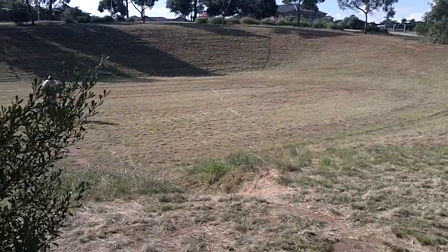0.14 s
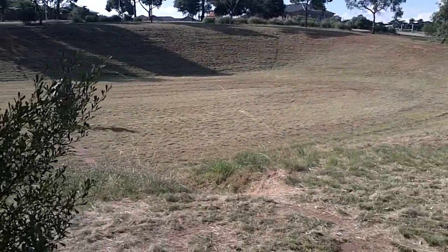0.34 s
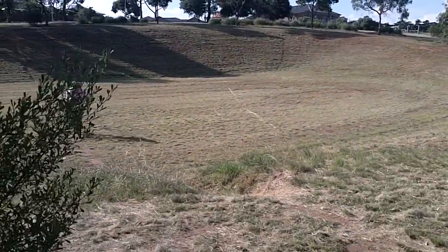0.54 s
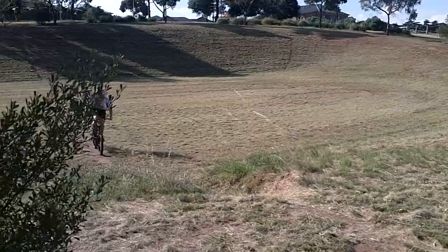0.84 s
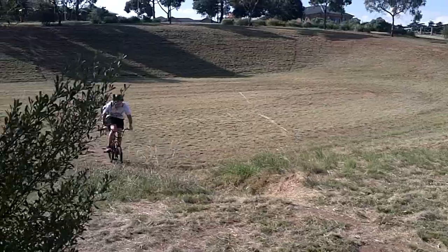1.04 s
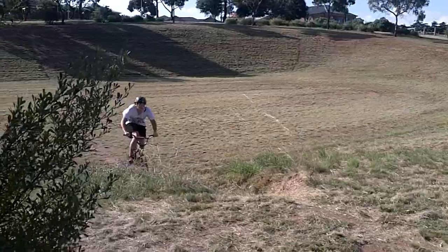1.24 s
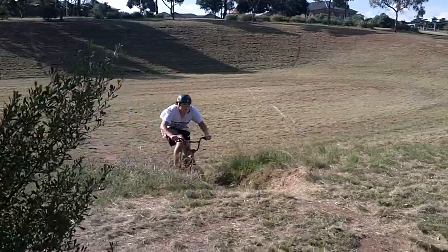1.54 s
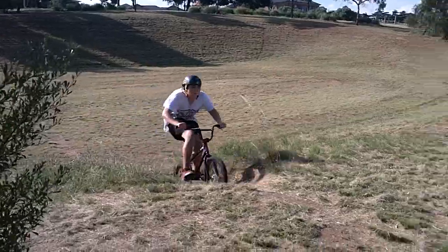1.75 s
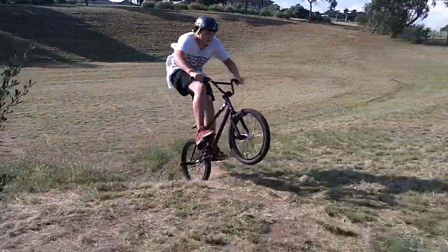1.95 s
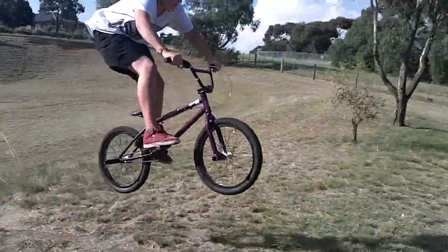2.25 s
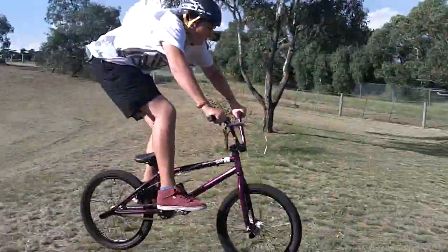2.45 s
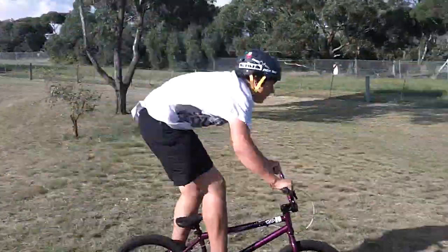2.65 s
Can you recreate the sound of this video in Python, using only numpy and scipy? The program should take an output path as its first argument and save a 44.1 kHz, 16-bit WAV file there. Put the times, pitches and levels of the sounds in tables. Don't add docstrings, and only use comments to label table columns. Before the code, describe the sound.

A small bicycle rushes nearer through dry grass, freewheel ticking in a jump, then thumps down close by

```python
import sys
import numpy as np
from scipy import signal
from scipy.fft import rfft, irfft
from scipy.io import wavfile
from scipy.ndimage import uniform_filter1d

SR = 44100
rng = np.random.default_rng(int(sys.argv[2]) if len(sys.argv) > 2 else 0)


def dump_mix(stems):
    frames = np.atleast_2d(stems).T
    limited = np.clip(frames, -1, 1)
    pcm = np.round(limited * 32767).astype(np.int16)
    wavfile.write(sys.argv[1], SR, pcm)


def gain_from_db(level_db):
    decades = np.asarray(level_db, float) / 20
    return 10 ** decades


N = 122598


def rms_one(x):
    return x / np.sqrt(np.mean(x ** 2) + 1e-20)


def in_time(rows):
    s, *columns = np.transpose(rows)
    return [np.interp(np.arange(N) / SR, s, column) for column in columns]


def drift(rate_hz):
    r = np.exp(-2 * np.pi * rate_hz * 40 / SR)
    white = rng.standard_normal(N // 40 + 2002)
    slow = signal.lfilter([1], [1, -2 * r, r * r], white)[2000:]
    return np.interp(np.arange(N) / 40, np.arange(len(slow)), rms_one(slow))


def band(x, low_hz, high_hz):
    sos = signal.butter(2, [low_hz, min(high_hz, .45 * SR)], "band", fs=SR, output="sos")
    return signal.sosfilt(sos, x)


def banded_noise(spectrum, patchy_db, rate_hz):
    hz, db = np.transpose(spectrum)
    edges = 16 * 2 ** np.arange(0, 10.6, .5)
    together = drift(rate_hz)
    white = rng.standard_normal((2, N + SR // 2))
    out = 0
    for k, (low_hz, high_hz) in enumerate(zip(edges, edges[1:])):
        middle = np.log(low_hz * high_hz) / 2
        band_db = np.interp(middle, np.log(hz), db, left=-90, right=-90)
        if band_db > -90:
            flicker_db = patchy_db * (together + 0.78 * drift(rate_hz))
            out = out + gain_from_db(band_db + flicker_db) * band(white[k % 2], low_hz, high_hz)[-N:]
    return rms_one(out)


def wind():
    # start_s, level_db
    wind_levels = [(0.0, -31.5), (0.1, -29), (0.32, -35), (0.53, -31), (0.76, -34), (1.35, -31.5),
                   (2.01, -28.5), (2.4, -28.5), (2.51, -31), (2.69, -20.5), (2.78, -26.5)]
    # edge_hz, density_db (per Hz)
    wind_colour = [(12, -32), (20, 4.5), (103, -5.5), (229, -14.5), (338, -24.5), (475, -28.5), (560, -35),
                   (700, -33.5), (910, -19), (1540, -120)]
    wind_db, = in_time(wind_levels)
    return gain_from_db(wind_db + 0.5) * banded_noise(wind_colour, patchy_db=0.95, rate_hz=25.5)


def buffets():
    # middle_s, level_db, length_s, low_hz, high_hz
    gusts = [(.1, -25.5, 0.029, 74, 131.4), (.8, -21, 0.012, 37.6, 248), (0.836, -25.5, 0.068, 24, 257),
             (.88, -27, 0.026, 62, 300), (.985, -27.5, 0.024, 34, 192), (1.1, -16.5, 0.035, 28.3, 314),
             (1.2, -26.5, 0.079, 21.8, 98), (1.376, -25, 0.081, 22.3, 117), (1.553, -7.5, 0.031, 26, 320),
             (1.74, -16, 0.033, 31, 308), (1.79, -21, 0.038, 46, 410), (1.87, -23, 0.021, 137, 323),
             (1.93, -27.5, 0.04, 69, 205), (2.06, -17, 0.044, 32.3, 235), (2.246, -20.5, 0.02, 31, 258),
             (2.3, -22, 0.03, 24, 150), (2.45, -26.5, 0.086, 30, 120), (2.54, -19.5, 0.061, 90, 251),
             (2.605, -14.5, 0.046, 91, 242), (2.66, -14.5, 0.049, 13.8, 198), (2.685, -11, 0.019, 25, 256),
             (2.72, -17, 0.023, 110, 620), (2.748, -13, 0.028, 86.4, 284), (2.778, -8.5, 0.011, 69, 370)]
    tilt_db = -4
    t = np.arange(-4096, 4096) / SR
    out = np.zeros(N)
    for middle_s, db, length_s, low_hz, high_hz in gusts:
        white = rng.standard_normal(2 * len(t))
        swell = np.exp(-(2 * t / length_s) ** 2)
        edges = np.geomspace(low_hz, high_hz, num=4)
        lump = 0
        for k, (a, b) in enumerate(zip(edges, edges[1:])):
            third = band(band(white, .7 * a, 1.3 * b), a, b)[len(t):]
            lump = lump + gain_from_db(tilt_db * k) * rms_one(swell * third)
        lump = rms_one(lump) * np.sqrt(np.mean(swell ** 2))
        at = int(middle_s * SR) + np.arange(len(t)) - len(t) // 2
        inside = (at >= 0) & (at < N)
        out[at[inside]] += gain_from_db(db) * lump[inside]
    return out


def field():
    # edge_hz, density_db (per Hz)
    field_colour = [(150, -0.5), (450, -6), (650, -7), (1050, -7), (2000, -15), (4000, -22.5),
                    (7000, -31.5), (14500, -47.5)]
    hiss = gain_from_db(-41.5) * banded_noise(field_colour, patchy_db=1.12, rate_hz=6.3)
    return signal.sosfilt(signal.butter(8, 14300, fs=SR, output="sos"), hiss)


def road():
    low_hz, high_hz, drone_db = 385, 513.5, -49
    fade_db = np.interp(np.arange(N) / SR, (1.9, 1.9), [0, -19])
    drone = band(band(rng.standard_normal(N), low_hz, high_hz), low_hz, high_hz)
    return gain_from_db(drone_db + fade_db + 0.93 * drift(3.3)) * rms_one(drone)


def bird():
    # start_s, pitch_hz, level_db
    chirp = [
        (0.0, 6060, -76),
        (0.01, 6540, -57),
        (0.026, 7185, -63),
        (0.032, 7100, -60),
        (0.04, 6623, -68),
        (0.05, 6350, -73),
    ]
    hz, db = in_time(chirp)
    whistle = np.sqrt(2) * np.sin(2 * np.pi * np.cumsum(hz) / SR)
    sounding = np.arange(N) < chirp[-1][0] * SR
    return gain_from_db(db + 6) * whistle * sounding


def frame_tick():
    first_s, ticks_per_s = .0055, 59.94
    ring_hz, tick_db, t60_s = 7750, -57, .006
    at_s = np.arange(first_s, N / SR, 1 / ticks_per_s)
    clicks = np.full(N, 1e-18)
    clicks[(at_s * SR).astype(int)] = gain_from_db(tick_db)
    r, w = gain_from_db(-60 / (t60_s * SR)), 2 * np.pi * ring_hz / SR
    ring = signal.lfilter([0, np.sin(w)], [1, -2 * r * np.cos(w), r * r], clicks)
    return band(ring, ring_hz - 600, ring_hz + 900)


def rush():
    # edge_hz, density_db (per Hz)
    rush_colour = [(500, -16), (850, -7.5), (1300, 2.5), (2000, 2), (4200, -4), (6500, -7), (10000, -13),
                   (15000, -14.5)]
    take_off_s, grass_low_hz, grass_lost = (2.1, 2.18), 3500, .55
    x = gain_from_db(12.5) * banded_noise(rush_colour, patchy_db=.8, rate_hz=25)
    grass = signal.sosfiltfilt(signal.butter(2, grass_low_hz, "high", fs=SR, output="sos"), x)
    return x - grass * np.interp(np.arange(N) / SR, take_off_s, [0, grass_lost])


def tyre_ring():
    middle_hz, width_hz, ring_db = 973, 163, 4.5
    hum = band(rng.standard_normal(N), middle_hz - width_hz / 2, middle_hz + width_hz / 2)
    return gain_from_db(ring_db + 2.0 * drift(44)) * rms_one(hum)


def freewheel():
    # start_s, teeth_passed (count)
    travel = [(1.99, 0), (2.114, 18), (2.17, 24), (2.182, 25), (2.238, 29), (2.2487, 30), (2.3137, 36),
              (2.3728, 41), (2.4269, 46), (2.6612, 67), (2.7913, 79)]
    pawl_db, spread_db, hub_db = 13, 2, 1
    t60_s, rise_s, fade_in_s, jitter_s = .02, .0004, 0.11, .0004
    s, teeth = np.transpose(travel)
    drops_s = np.interp(np.arange(teeth[-1]), teeth, s)
    chance = rng.standard_normal((len(drops_s), 2))
    at = ((drops_s + jitter_s * chance[:, 0]) * SR).astype(int)
    fade_in = np.clip((drops_s - s[0]) / fade_in_s, 0, 1)
    clicks = np.zeros(N + SR)
    clicks[at] = gain_from_db(spread_db * chance[:, 1]) * fade_in
    burst = signal.lfilter([1], [1, -gain_from_db(-60 / (t60_s * SR))], clicks[:N] + 1e-18)
    burst = uniform_filter1d(burst, size=int(2 * rise_s * SR))
    white = rng.standard_normal(N)
    pawl = rms_one(band(white, 5100, 15500))
    hub = rms_one(band(white[::-1], 3300, 5100))
    return gain_from_db(pawl_db) * burst * (pawl + gain_from_db(hub_db) * hub)


def bicycle():
    # start_s, level_db
    nearness = [(0, -85), (.7, -69), (1.5, -64.5), (1.85, -62.5), (2.0, -57), (2.1, -55.5), (2.2, -55.5),
                (2.45, -52.5), (2.64, -50), (2.67, -54.5), (2.7, -48), (2.765, -48.5), (2.78, -39)]
    near_db, = in_time(nearness)
    return gain_from_db(near_db) * (rush() + tyre_ring() + freewheel())


def scene():
    air = wind() + buffets() + field() + road()
    return np.tile(air + bird() + bicycle(), (2, 1))


def port(x):
    # middle_hz, width_hz, depth_db
    cancellations = [(2706, 502, -45), (5470, 410, -35), (7855, 790, -34), (10970, 390, -20)]
    lift_hz, lift_width_hz, lift_db = 4410, 584, 3.5
    padded = np.pad(x, 2048, mode="reflect")
    hz = np.arange(len(padded) // 2 + 1) * SR / len(padded)
    gain = gain_from_db(lift_db * np.exp(-((hz - lift_hz) / lift_width_hz) ** 8))
    for middle_hz, width_hz, depth_db in cancellations:
        off = ((hz - middle_hz) / width_hz) ** 2
        gain = gain * np.sqrt((off + gain_from_db(2 * depth_db)) / (1 + off))
    return irfft(rfft(padded) * gain, len(padded))[2048:-2048]


def limiter(x):
    limit_db, release_db_per_s, squeeze = -13.5, 244, .8
    climb_db = release_db_per_s * np.arange(N) / SR
    held_db = np.maximum.accumulate(20 * np.log10(abs(x) + 1e-9) + climb_db) - climb_db
    over_db = np.maximum(held_db - limit_db, 0)
    return x * gain_from_db(-squeeze * signal.lfilter([.02], [1, -.98], over_db))


def difference(d):
    low_hz, sure_hz = 300, 2800
    kept_far, kept_near, blur = 0.63, .12, 0.21

    def keep(from_hz, to_hz):
        sos = signal.butter(4, [from_hz, to_hz], "band", fs=SR, output="sos")
        return signal.sosfiltfilt(sos, d)

    blocks = np.arange(N // 1024 + 2) * 1024 + 344
    edges = np.geomspace(low_hz, sure_hz, num=9)
    share = np.interp(blocks / SR, [1.4, 2.1], [kept_far, kept_near])
    flutter = rms_one(band(rng.standard_normal(N), 150, 600))
    out = keep(sure_hz, .45 * SR) * (1 - blur / 2 + blur * flutter)
    for k, luck in enumerate(rng.random((8, len(blocks)))):
        survives = luck < share * (k + 5) / 9
        out = out + keep(edges[k], edges[k + 1]) * np.interp(np.arange(N), blocks, survives)
    return out


def band_limit(x):
    return signal.sosfilt(signal.butter(12, 15640, fs=SR, output="sos"), x)


def record(dry):
    x = limiter(port(dry[0]) + frame_tick())
    x = signal.sosfilt(signal.cheby2(20, 15, 15330, fs=SR, output="sos"), x)
    late = np.concatenate([x[:1], x[:-1]])
    middle = (late + x) / 2
    side = difference((late - x) / 2)
    return band_limit(np.array([middle + side, middle - side]))


dry = scene()
out = record(dry)
dump_mix(out)
```